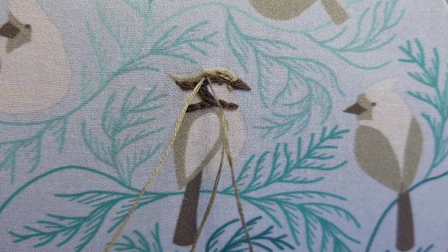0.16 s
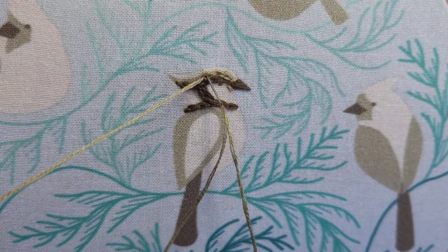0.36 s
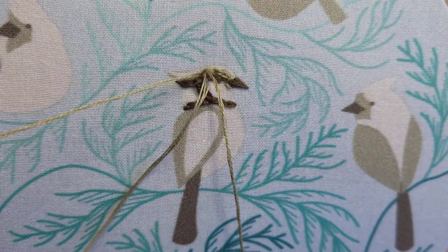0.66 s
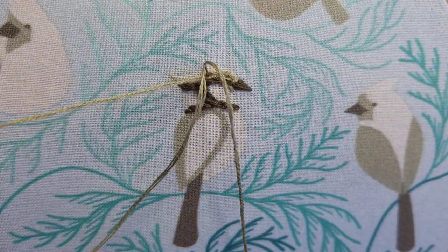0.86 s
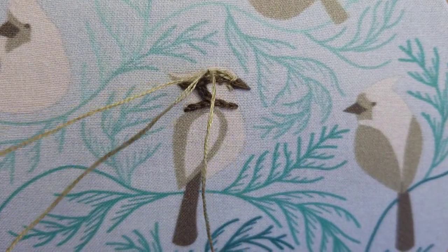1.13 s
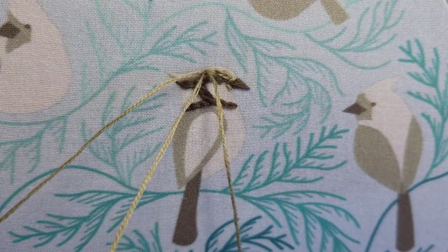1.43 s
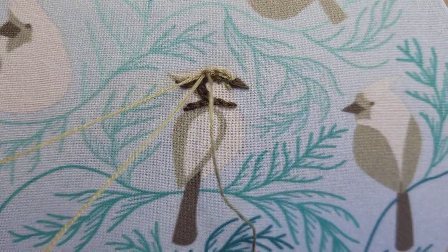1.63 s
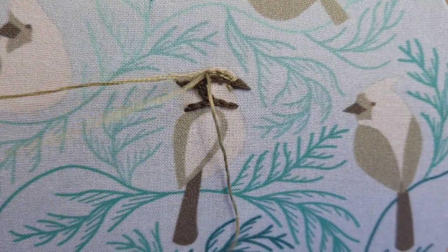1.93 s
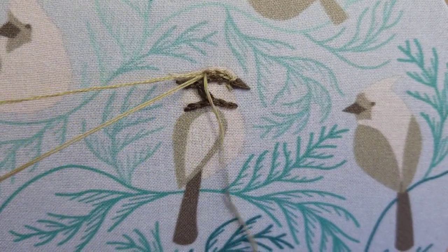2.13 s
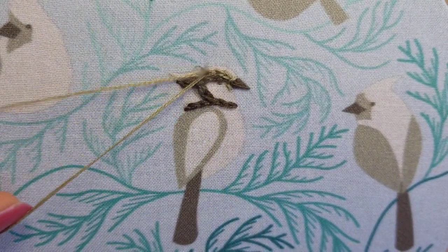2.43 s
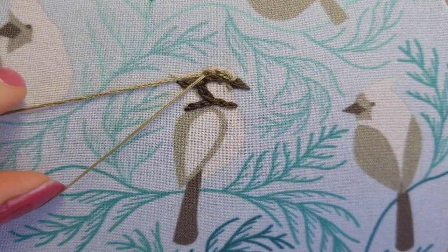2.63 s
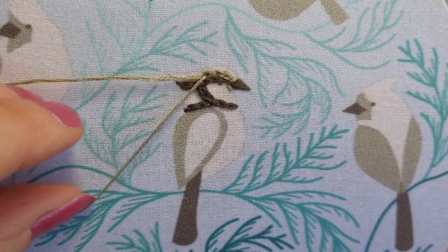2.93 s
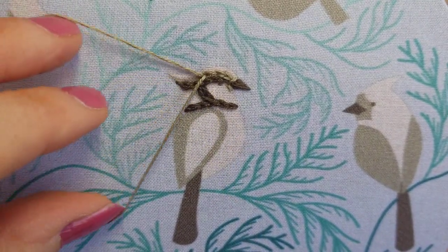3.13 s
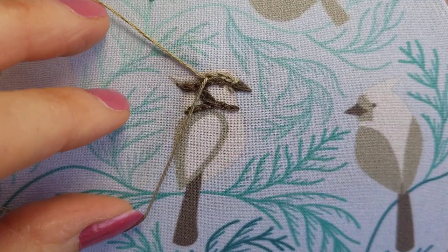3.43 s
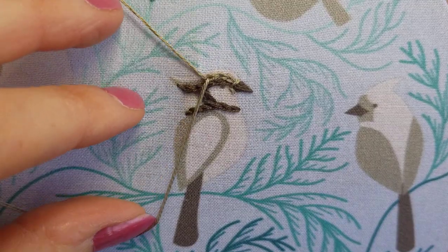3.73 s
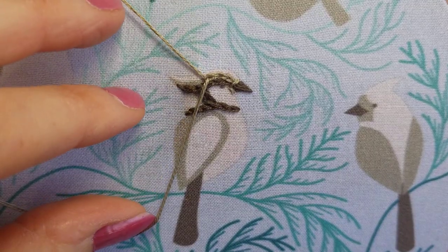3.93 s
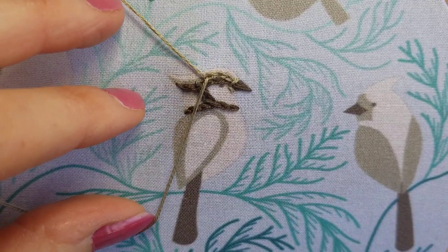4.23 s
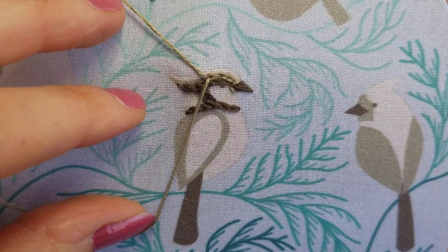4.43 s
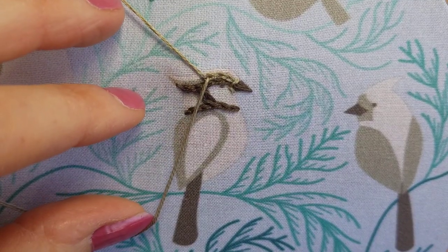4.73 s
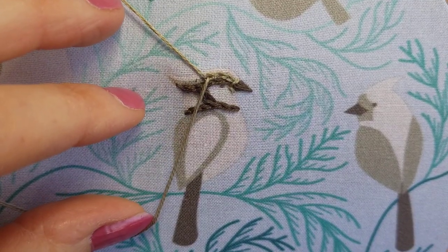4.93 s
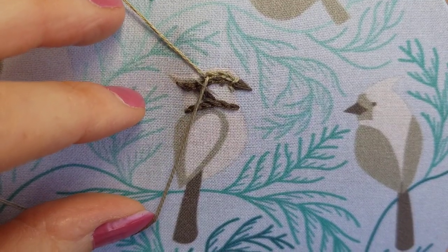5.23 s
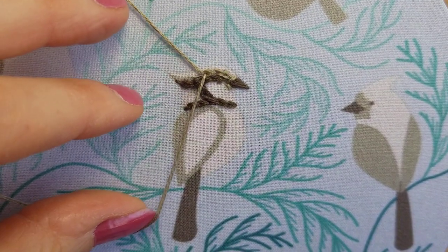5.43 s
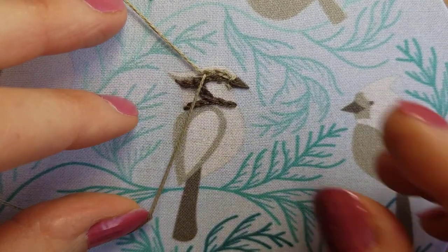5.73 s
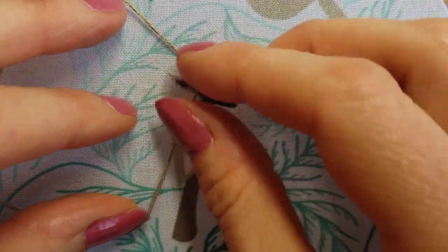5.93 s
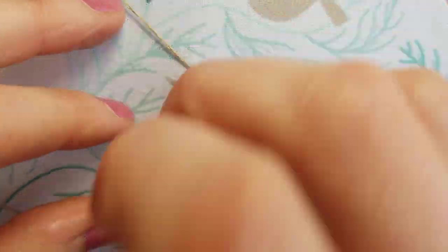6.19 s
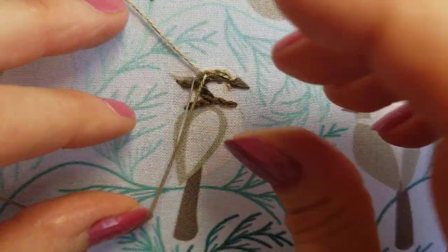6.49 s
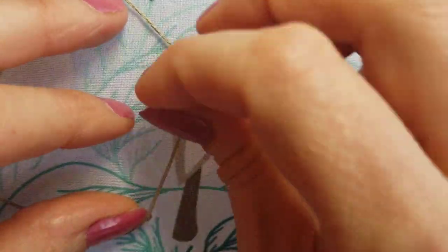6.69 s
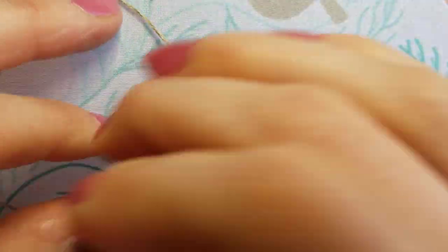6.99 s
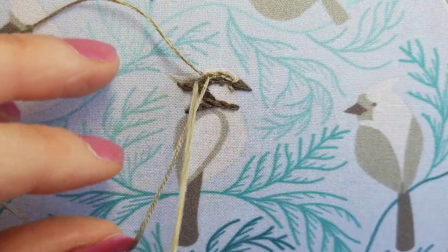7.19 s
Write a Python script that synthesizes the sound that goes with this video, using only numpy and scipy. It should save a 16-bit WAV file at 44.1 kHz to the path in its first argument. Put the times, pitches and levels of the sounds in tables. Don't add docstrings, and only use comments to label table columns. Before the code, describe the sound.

Fingers drag thread through taut cloth with scratchy rasps and low drum-like thumps, sparse small clicks between, very close up in a quiet room.

```python
import sys
import numpy as np
from scipy import signal
from scipy.io import wavfile
from scipy.ndimage import uniform_filter1d

SR = 44100
rng = np.random.default_rng(int(sys.argv[2]) if len(sys.argv) > 2 else 0)


def natural_amplitude(level_db):
    exponent = np.asarray(level_db, float) / 20
    return 10 ** exponent


def output_pcm(signal):
    pcm = np.clip(np.atleast_2d(signal).T, -1, 1) * 32767
    wavfile.write(sys.argv[1], SR, np.round(pcm).astype(np.int16))


N = 324135

# [f/Hz, density/dB per Hz]
HUSH = [(15, -51), (25, -8), (50, -8.5), (81, -21.5), (95, -8.5), (117, -1), (157, -13), (210, -19),
        (267, -31), (314, -25.5), (443, -38), (2020, -42), (5130, -44), (6700, -45.5), (14500, -42.5)]
# [f/Hz, correlation]
LIKENESS = [(60, 0.99), (150, 0.9), (370, 0.19), (920, 0.0094), (2280, -0.02), (5660, -0.1), (14000, -0.01)]
# [f/Hz, t60/s]
ROOM = [(200, 0.19), (1300, 0.25), (3500, 0.26), (12000, 0.16)]
# [f/Hz, width/Hz, level/dB]
PORTS = [
    [(1360, 250, 4), (2270, 500, 4.5), (5930, 2400, -14.5), (9600, 1100, 1), (12500, 2500, 2)],
    [(2265, 100, 2.5), (3890, 600, 2.5), (6745, 680, 10.5), (10500, 1900, 10.5), (11350, 770, 7),
     (14200, 2300, -7.5)],
]

# [full strength from t/s, held/s, fibre level/dB, coarse level/dB re fibre, fade by 20 dB/s]
STROKES = [
    [(.19, .02, -83, -8, .15), (.31, .06, -77, -5, .15), (.53, .02, -74, -5, .2), (.756, .01, -79, -6, .1),
     (.83, .06, -82, 2, .15)],
    [(1.5, .095, -62.5, -1, .04)],
    [(1.72, .03, -76, -5, .2), (1.85, .17, -67.5, -5.5, .25), (2.08, .12, -70, -5, .1),
     (2.218, .02, -66, -.5, .05), (2.28, .02, -75, 0, .1), (2.34, .04, -73, -1, .1),
     (2.49, .03, -71, -3, .2), (2.55, .02, -76, 2, .08)],
    [(2.865, .04, -64, -14, .2), (3.0, .04, -70, -18, .13), (3.18, .005, -73, -15, .03)],
    [(5.095, .19, -74.5, -6, .15), (5.372, .008, -63, -17, .035)],
    [(5.79, .01, -78, -2, .25), (5.92, .02, -83, 3, .2), (6.014, .01, -77, -10, .1)],
    [(6.751, .02, -61, 2, .1), (6.795, .01, -54, -9, .085), (6.83, .02, -72, 4, .05)],
    [(7.03, .185, -63, -2, .16), (7.32, .03, -66, 1, .1)],
]
# [contact from t/s, swell by 20 dB/s, left-right level/dB]
HANDS = [
    (0, .12, -1),
    (1.497, .05, 1),
    (1.64, .09, -5),
    (2.76, .07, -2),
    (4.98, .065, -4),
    (5.7, .1, -1),
    (6.748, .1, 1),
    (6.998, .06, -4),
]
# [f/Hz, width/Hz, left level/dB, right level/dB]
POCKETS = [
    [(6440, 610, 0, 7.5)],
    [(1420, 200, 6, 6), (2450, 200, 6, 6), (3800, 300, 3, 3), (7600, 650, 4, -3.5)],
    [(2420, 220, 8, 7), (4250, 350, -6, -1), (5800, 300, -3, -4), (9400, 670, 13, 2), (12920, 310, 13, 7)],
    [(2260, 280, 13, 14), (3200, 220, 9, 11), (4400, 300, 1.5, 11)],
    [(9500, 360, -2, 6)],
    [(6400, 400, 7, -1)],
    [(3400, 600, 1, 5.5), (6700, 600, 7, -5), (11100, 400, -1, 0)],
    [(2130, 84, 6, 7), (3990, 130, -1, 13), (8600, 500, 15, 2), (11850, 1500, 15, 5), (14400, 1700, 11, -5)],
]
# [t/s, f/Hz]
GAP = [
    (1.88, 3400),
    (2.05, 4300),
    (2.25, 4500),
    (2.35, 3950),
    (2.6, 4050),
]

# [full strength from t/s, held/s, drum level/dB, weave level/dB re drum, fade by 20 dB/s]
RUBS = [
    [(.25, .08, -69, -10, .2), (.518, .015, -47, -2, .09), (.55, .04, -47, -9, .03)],
    [(.745, .02, -52, -13, .1), (.9, .45, -58.5, -26, .2)],
    [(1.525, .072, -39.5, -11, .035)],
    [(1.695, .2, -48.5, -21, .3), (1.93, .08, -42, -13, .2), (2.05, .04, -45, -12, .1),
     (2.15, .09, -46, -14, .08), (2.29, .02, -45, -14, .06), (2.35, .045, -41.5, -13, .06),
     (2.452, .07, -43, -9, .1), (2.55, .05, -49, -6, .08), (2.63, .015, -44, -10, .075),
     (2.86, .09, -61, -3, .1), (3.0, .35, -64, -20, .1)],
    [(3.52, .3, -66, -10, .15)],
    [(5.085, .15, -68, -4, .1)],
    [(5.64, .03, -70, 2, .1), (5.755, .04, -63, -18, .1), (5.92, .08, -68, -4, .06)],
    [(6.215, .005, -57, -12, .08)],
    [(6.785, .02, -38, -7, .08), (6.83, .02, -49, -8, .09)],
    [(7.014, .23, -41.5, -7.5, .13), (7.315, .04, -38, -10, .1)],
]
# [contact from t/s, swell by 20 dB/s]
PLACES = [
    (0, .04),
    (.7, .1),
    (1.5, .04),
    (1.6, .055),
    (3.4, .1),
    (4.95, .1),
    (5.5, .035),
    (6.15, .08),
    (6.775, .1),
    (6.99, .025),
]
# [f/Hz, width/Hz, level/dB]
TINTS = [
    [(232, 170, 5.5), (750, 330, -8), (1180, 160, 6), (1330, 120, -4)],
    [(485, 250, 2), (1300, 400, -8)],
    [(1400, 140, 11), (700, 300, 2)],
    [(600, 280, 5), (950, 120, 0)],
    [(543, 200, -1.5)],
    [(890, 260, 13.5)],
    [(910, 330, 10)],
    [(900, 400, 1)],
    [(1380, 300, 5)],
    [(488, 89, 3), (1250, 140, 4.5)],
]
# [f/Hz, density/dB per Hz]
BOOM = [(18, -47.5), (30, -29), (45, -0.5), (57, 10), (92, 1), (156, 7), (274, -13), (395, -24.5),
        (500, -18.5), (650, -45), (1100, -120)]
# [f/Hz, width/Hz, level/dB]
BUZZ = [(266, 242, 3.5), (515, 186, -3), (775, 190, -11.5), (956, 270, -18.5), (1280, 135, -15.5),
        (1505, 120, -23.5)]

# [t/s, peak level/dB, body f/Hz, snap level/dB re peak, left-right level/dB]
TICKS = [(0.821, -65, 2400, -18, 0.0), (0.869, -64, 2180, -24, 2), (2.217, -52, 1320, -17, -7),
         (2.232, -56, 2220, -24, -16), (3.176, -69.5, 2230, 4, 3), (3.27, -64.5, 1250, 0.5, 3),
         (3.502, -64.5, 902, -4, -2), (3.523, -55, 1270, -1.5, 2.5), (3.604, -63.5, 1240, 5, 1.0),
         (3.646, -51, 1300, 1.5, -1), (3.647, -59, 3450, -8, -2), (3.679, -63, 600, 2, 3),
         (3.684, -68, 2300, -8, 0), (3.731, -65, 1350, -4, 6), (3.747, -62.5, 1280, -2, -2),
         (3.781, -65, 1250, -4, 2.0), (4.419, -53, 2050, -5.5, 4), (4.421, -57, 400, -10, 2),
         (4.423, -61, 1280, -10, 2), (4.425, -65, 3070, -10, 0), (0.647, -63, 900, -20, 2)]
# [t/s, peak level/dB, ring f/Hz, left-right level/dB, ring level/dB]
CLICKS = [(1.423, -58, 2900, -6, 5), (1.443, -64, 3000, -8, 3), (1.453, -55, 1750, -3, 5),
          (1.488, -61, 1720, 0, 2), (5.625, -43, 3300, -9, -7), (5.628, -53, 4600, -6, 0),
          (5.634, -54, 1650, -6, 0), (5.644, -54, 2950, -6, -7), (5.659, -57, 4600, -6, -3),
          (5.674, -56, 3700, -6, -8), (5.914, -58, 1650, -8, 2), (5.944, -63, 3600, -6, -5),
          (5.973, -59, 1640, -10, 2), (6.089, -62, 1620, -10, 2), (6.125, -60, 3110, 4, -11),
          (6.161, -57, 1620, -7, 2), (6.178, -63, 3000, -6, -5), (6.361, -62, 2140, 12, -7),
          (6.695, -66, 2310, 9, -2), (6.957, -66, 2110, 7, -3)]
# [f/Hz, density/dB per Hz]
CLICK_COLOUR = [(200, -21.5), (500, -3.5), (1000, 2.5), (1700, -1), (2500, -10), (3250, 2), (3900, -4),
                (4700, -2.5), (6600, -15.5), (7500, -38.5), (12000, -59)]

# [t/s, push strength with its direction, drum f/Hz, contact/ms, overtone level/dB]
BLOWS = [
    [(0.7238, .045, 64, 3.15, -3), (1.4977, .22, 65, 0.43, 0)],
    [(6.7488, -.45, 94, 0.66, 1)],
    [(1.961, .016, 110, 2.5, -8), (2.003, .02, 115, 2.5, -8), (2.296, .015, 120, 2.5, -6),
     (2.355, .018, 120, 2.5, -6), (2.383, -.018, 115, 2.5, -8), (2.458, -.022, 120, 2.2, -4),
     (5.2712, -.02, 99, 2.07, -2), (6.006, .028, 108, 2.14, -6), (6.0175, .042, 102, 2.5, -8),
     (6.146, .0115, 98.5, 2.4, -18), (6.1588, .09, 94, 3.1, -12), (6.162, -.03, 94.6, 1.82, -25)],
]
# [multiple of the pitch, left level/dB, right level/dB, t60/s]
DRUMS = [
    [(1, -2.5, -8.5, .2), (2.0, 5.5, -1.5, .05), (2.57, -15, -22, .12), (3.2, -19, -27, .15),
     (6.7, -22, -25, .08), (8.5, -23, -24, .05), (12.3, -28, -29, .06), (21, -34, -35, .08)],
    [(1, -3, -9, .16), (1.55, -8, -13, .07), (2, -10, -22, .06), (2.8, -28, -32, .04), (4.5, -24, -21, .05),
     (6.2, -24, -25, .04), (8.3, -30, -30, .07), (16, -40, -40, .08)],
    [(1, -1.5, -7, .2), (1.59, -2, -8, .064), (2.14, 0, -6, .06), (3.2, -8, -14, .06),
     (4.6, -20, -24, .027)],
]
DAMPED_S = [.07, .041, .041]


def evened(x):
    return x / np.sqrt(np.mean(x ** 2) + 1e-20)


def read(points, hz):
    f, value = np.transpose(points)
    return np.interp(np.log(hz + 1), np.log(f + 1), value)


def add(mix, s, sound):
    part = mix[:, round(s * SR):][:, :sound.shape[1]]
    part += sound[:, :part.shape[1]]


def coloured(x, db_at):
    hz = abs(np.fft.fftfreq(8192, 1 / SR))
    log_gain = np.log(natural_amplitude(np.maximum(db_at(hz), -100)))
    taps = np.fft.ifft(np.exp(signal.hilbert(log_gain).conj())).real[:4096]
    return signal.oaconvolve(x, taps[None], axes=1)[:, :x.shape[1]]


def band(x, lo_hz, hi_hz):
    edges_hz = [lo_hz, min(hi_hz, SR / 2 - 500)]
    return signal.sosfilt(signal.butter(2, edges_hz, "band", fs=SR, output="sos"), x)


def bells(cavities):
    return lambda hz: sum(db / (1 + (2 * (hz - f) / w) ** 2) for f, w, db in cavities)


def ports(x, cavities):
    return np.concatenate([coloured(x[k:k + 1], bells(c)) for k, c in enumerate(cavities)])


def hush():
    frames, hz = N // 512 + 5, np.fft.rfftfreq(2048, 1 / SR)
    a, b, c, d, patches = rng.standard_normal((frames, 1025, 5)).T
    patches = evened(uniform_filter1d(uniform_filter1d(patches, 12, 0), 8, 1))
    same = np.clip(read(LIKENESS, hz), -1, 1)[:, None]
    left = a + 1j * b
    right = same * left + np.sqrt(1 - same ** 2) * (c + 1j * d)
    z = np.array([left, right]) * natural_amplitude(read(HUSH, hz)[:, None] + 0.25 * patches)
    noise = signal.istft(z, nperseg=2048, noverlap=1536)[1][:, :N]
    return natural_amplitude(-60.5) * evened(noise)


def slips(per_s, spread_db, same):
    sizes = natural_amplitude(spread_db * np.minimum(rng.exponential(1, (3, N)), 4)) * rng.standard_normal((3, N))
    left, right, both = sizes * (rng.random((3, N)) < per_s / SR)
    same = np.clip(same, 0, 1)
    return evened(np.sqrt(same) * both + np.sqrt(1 - same) * np.array([left, right]))


def played(rows, contact_s, swell_s):
    full_s, held_s, db, second_db, fade_s = np.transpose(rows)[:, :, None]
    end_s = min((full_s + held_s + 3 * fade_s).max(), N / SR)
    t = np.arange(max(contact_s, 0), end_s, 1 / SR)
    rise = np.maximum(full_s - t, 0) / swell_s
    fall = np.maximum(t - full_s - held_s, 0) / fade_s
    gain = natural_amplitude(db - 20 * (rise + fall)) * np.minimum((t - t[0]) / .006, 1)
    start = round(t[0] * SR)
    part = slice(start, start + len(t) - 1)
    return part, np.linalg.norm(gain, axis=0)[:-1], np.linalg.norm(gain * natural_amplitude(second_db), axis=0)[:-1]


def gap(x):
    width_hz, level_db = 300, 1.5
    s, hz = np.transpose(GAP)
    t = np.arange(N) / SR
    turn = np.exp(2j * np.pi * np.cumsum(np.interp(t, s, hz)) / SR)
    r = np.exp(-np.pi * width_hz / SR)
    near = (t > s[0] - .1) & (t < s[-1] + .1)
    resonance = 2 * (turn * signal.lfilter([1 - r], [1, -r], x / turn)).real
    return x + near * natural_amplitude(level_db) * resonance


def thread():
    flutter_db = 0.5 * evened(uniform_filter1d(rng.standard_normal(N), 500))
    fine = natural_amplitude(flutter_db - 3) * evened(band(slips(9000, 3.2, .15), 5000, 16000))
    coarse = gap(evened(band(slips(5500, 2.0, 0.35), 1400, 4700)))
    coarse = natural_amplitude(3 * flutter_db + 0.14) * coarse
    out = np.zeros((2, N))
    for rows, (contact_s, swell_s, pan_db), pockets in zip(STROKES, HANDS, POCKETS):
        part, fine_gain, coarse_gain = played(rows, contact_s, swell_s)
        sound = fine_gain * fine[:, part] + coarse_gain * coarse[:, part]
        sound = sound * natural_amplitude([[pan_db / 2], [-pan_db / 2]])
        sides = [[(f, w, db[k]) for f, w, *db in pockets] for k in range(2)]
        add(out, part.start / SR, ports(sound, sides))
    return out


def weave_modes(hz):
    return 10 * np.log10(sum(natural_amplitude(2 * db) / (1 + (2 * (hz - f) / w) ** 2) ** 2 for f, w, db in BUZZ))


def skin():
    boom = evened(coloured(slips(1600, 1.5, 0.95), lambda hz: read(BOOM, hz)))
    buzz = evened(coloured(slips(3000, 2.2, 0.7), weave_modes))
    boom = boom * natural_amplitude([[3.0], [-4.0]])
    buzz = buzz * natural_amplitude([[1.5], [-1.5]])
    out = np.zeros((2, N))
    for rows, place, tint in zip(RUBS, PLACES, TINTS):
        part, drive, rattle = played(rows, *place)
        sound = drive * boom[:, part] + rattle * buzz[:, part]
        add(out, part.start / SR, coloured(sound, bells(tint)))
    return np.array([out[0], np.roll(out[1], 5)])


def burst(decay_ms):
    both, left, right = rng.standard_normal((3, 2500))
    return (both + np.array([left, right])) * np.exp(-np.arange(2500) / SR / (decay_ms / 1000))


def ping(hz, decay_ms):
    t = np.arange(2500) / SR
    return np.sin(2 * np.pi * hz * t) * np.exp(-1000 * t / decay_ms) * np.minimum(hz * t, 1)


def room(x):
    taps = np.zeros((2, SR // 2))
    at = np.arange(100, SR // 2 - 20, 20) + rng.integers(0, 20, (2, (SR // 2 - 101) // 20))
    np.put_along_axis(taps, at, rng.choice([-1., 1.], at.shape), 1)
    hz, t, z = signal.stft(taps, SR, nperseg=256)
    tail = signal.istft(z * natural_amplitude(-60 * t / read(ROOM, hz)[:, None]), SR, nperseg=256)[1]
    return signal.oaconvolve(x, tail / np.linalg.norm(tail[0]), axes=1)[:, :N]


def hoop_tick(db, hz, snap_db, pan_db):
    body = natural_amplitude(-8) * ping(hz, 2.8) + natural_amplitude(-6 + .45 * (db + 55)) * band(burst(2.5), 600, 5000)
    body = body + natural_amplitude(1.5) * band(burst(5.4), 190, 620)
    tick = body / abs(body).max() + natural_amplitude(snap_db - 1.5) * band(burst(2.45), 9200, 12800)
    return natural_amplitude(db + 1.5) * tick * natural_amplitude([[pan_db / 2], [-pan_db / 2]])


def far_click(db, hz, pan_db, ring_db):
    knock = 0.25 * burst(2.5) + signal.unit_impulse(2500)
    click = evened(coloured(knock, lambda f: read(CLICK_COLOUR, f)))
    twin_hz = 2 * hz if hz < 1700 else hz
    click = click + natural_amplitude(ring_db + 1.5) * evened(ping(twin_hz, 1.8))
    click = click + natural_amplitude(ring_db - 2) * evened(band(burst(7.), .94 * hz, 1.06 * hz))
    return natural_amplitude(db - 0.5) * click / abs(click).max() * natural_amplitude([[pan_db / 2], [-pan_db / 2]])


def ticks():
    dry, wet = np.zeros((2, 2, N))
    for s, db, hz, snap_db, pan_db in TICKS:
        tick = hoop_tick(db, hz, snap_db, pan_db)
        add(dry, s, tick)
        add(wet, s, natural_amplitude(-5 - .4 * (db + 58)) * tick)
    for s, db, hz, pan_db, ring_db in CLICKS:
        click = far_click(db, hz, pan_db, ring_db)
        add(dry, s, click)
        add(wet, s, natural_amplitude(-4.5 - .6 * pan_db) * click)
    return dry + room(wet)


def blow(strength, hz, contact_ms, overtones_db, drum, damped_s):
    t = np.arange(int(.3 * SR)) / SR
    u = (t - .008) / (contact_ms / 1000)
    front = min(.22 + .2 * contact_ms, .8)
    push = np.exp(-(u / np.where(u < 0, front, .8)) ** 2)
    ring = np.zeros((2, len(t)))
    for k, (multiple, left_db, right_db, t60) in enumerate(drum):
        mode_db = np.array([[left_db], [right_db]]) + overtones_db * (k > 0)
        ring += natural_amplitude(mode_db - 60 * t / t60) * np.sin(2 * np.pi * hz * multiple * t)
    swing = -signal.oaconvolve(ring, push[None] / push.sum())[:, :len(t)]
    swing = swing * np.exp(-(t / damped_s) ** 4)
    left = push + np.roll(swing[0], 28)
    right = natural_amplitude(-4) * np.roll(push, 6) + np.roll(swing[1], 35)
    out = strength * np.array([left, right])
    weave = abs(strength) * natural_amplitude(overtones_db / 2)
    tear = natural_amplitude(-14) * band(burst(0.8), 2900, 4800) + natural_amplitude(-4) * band(burst(6.1), 420, 1100)
    add(out, .008, weave * natural_amplitude(-15 * contact_ms) * tear)
    shiver = band(burst(25.4), 380, 680)
    add(out, .009, weave * natural_amplitude(-12 - 2.2 * contact_ms) * shiver)
    return out


def blows():
    out = np.zeros((2, N))
    for rows, drum, damped_s in zip(BLOWS, DRUMS, DAMPED_S):
        for s, *row in rows:
            add(out, s - .008, blow(*row, drum, damped_s))
    return out


def scene():
    struck = blows()
    cloth = struck + natural_amplitude(-11.5) * room(struck) + skin()
    cloth = signal.sosfiltfilt(signal.butter(2, 53, "high", fs=SR, output="sos"), cloth)
    return ports(cloth + thread() + ticks(), PORTS) + hush()


def top_cut(x):
    return signal.sosfilt(signal.butter(12, 14640, fs=SR, output="sos"), x)


def record(dry):
    dry = dry * np.minimum(np.arange(N) / (.015 * SR), 1)
    mix = signal.sosfilt(signal.butter(2, 36, "high", fs=SR, output="sos"), dry)
    return top_cut(mix)


dry = scene()
out = record(dry)
output_pcm(out)
```